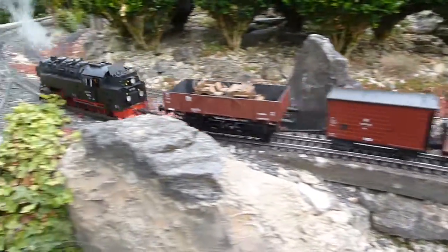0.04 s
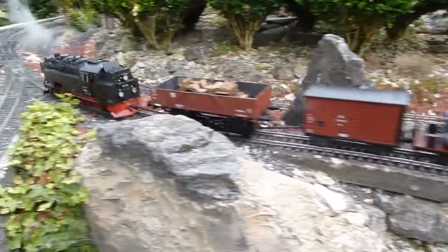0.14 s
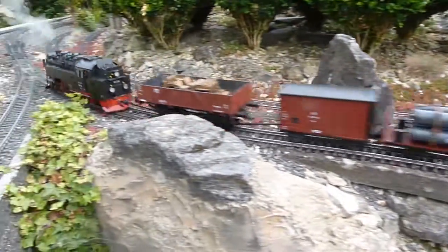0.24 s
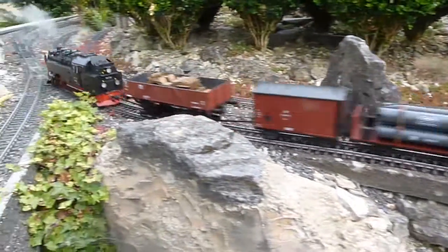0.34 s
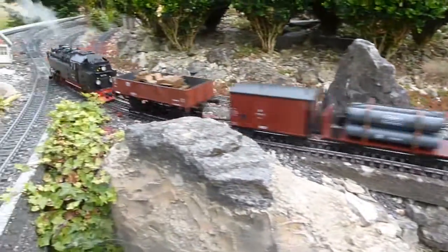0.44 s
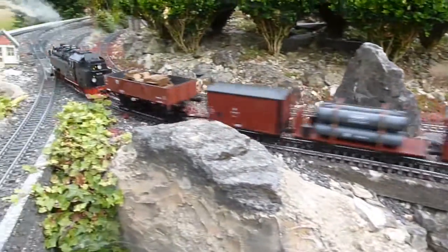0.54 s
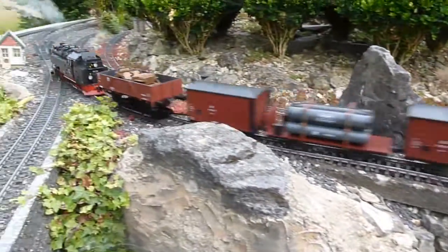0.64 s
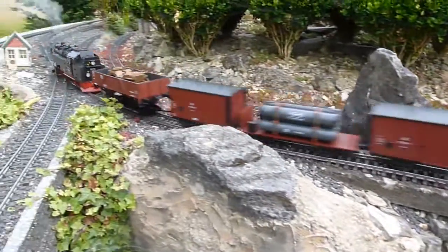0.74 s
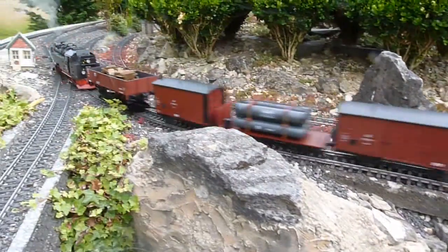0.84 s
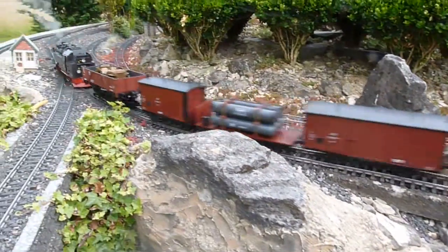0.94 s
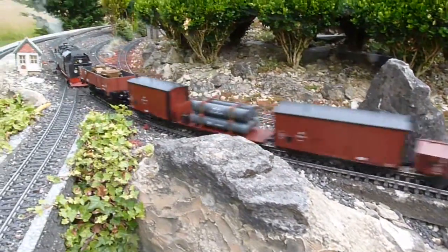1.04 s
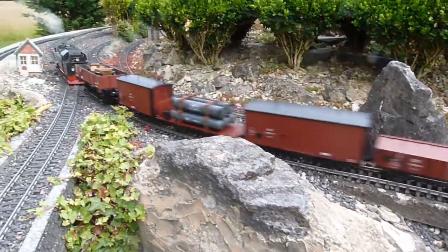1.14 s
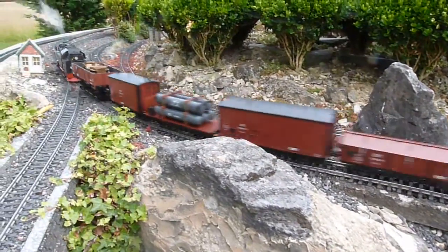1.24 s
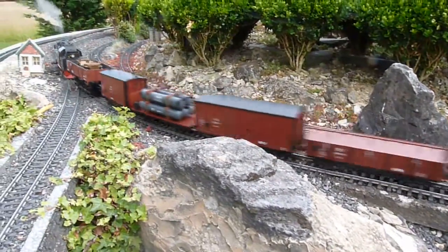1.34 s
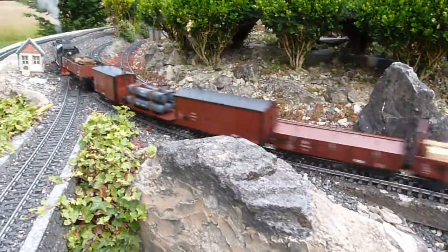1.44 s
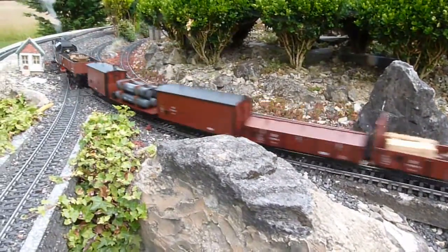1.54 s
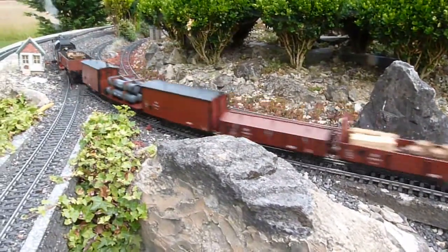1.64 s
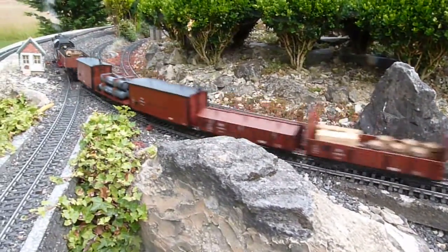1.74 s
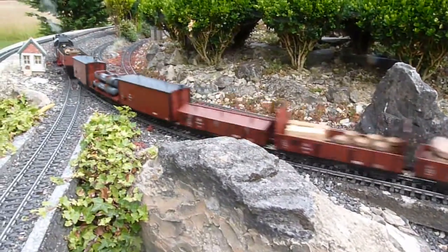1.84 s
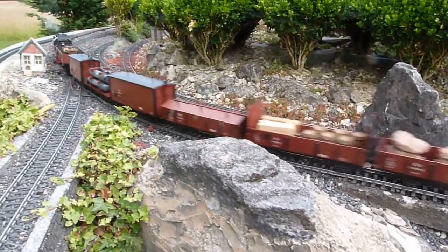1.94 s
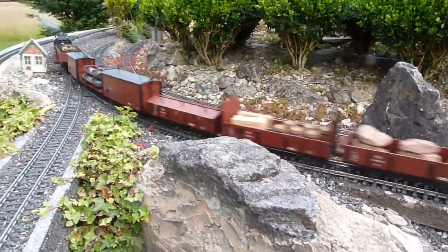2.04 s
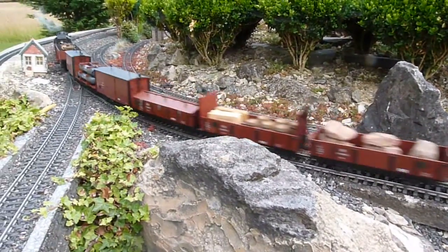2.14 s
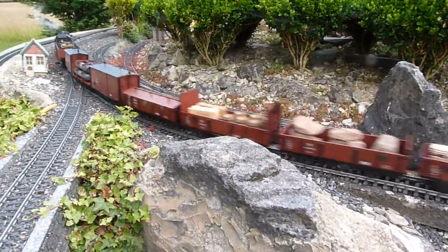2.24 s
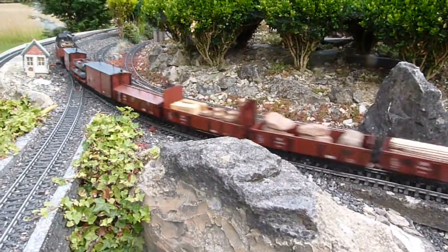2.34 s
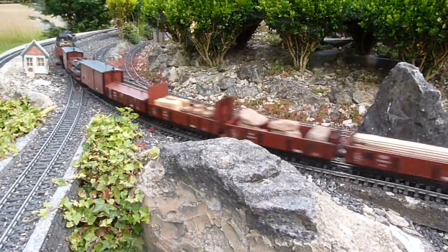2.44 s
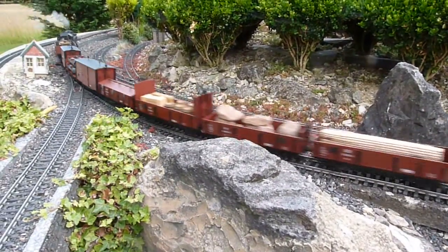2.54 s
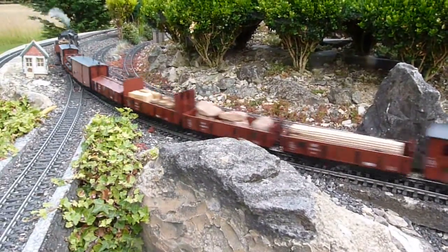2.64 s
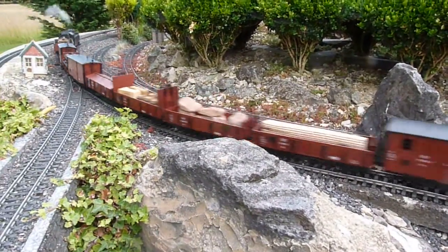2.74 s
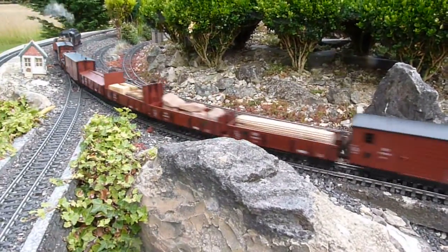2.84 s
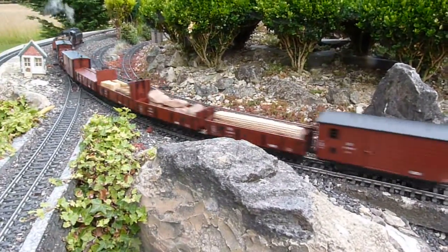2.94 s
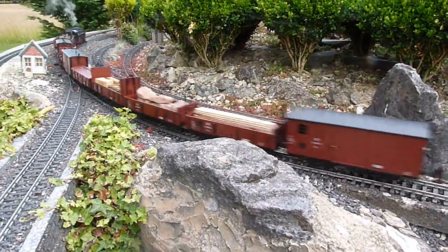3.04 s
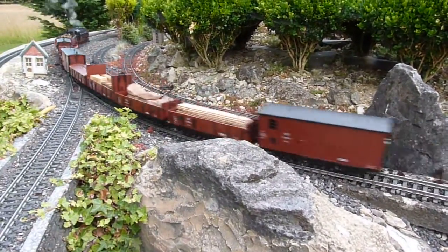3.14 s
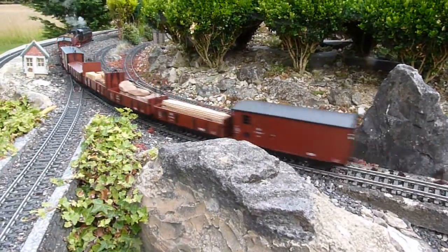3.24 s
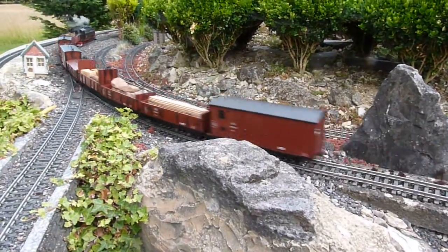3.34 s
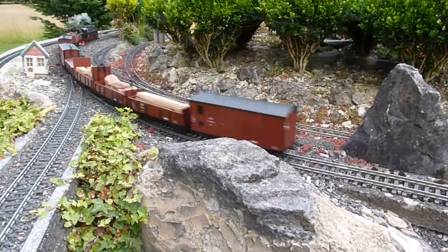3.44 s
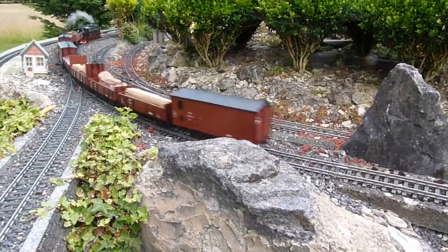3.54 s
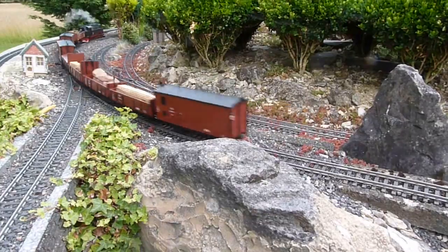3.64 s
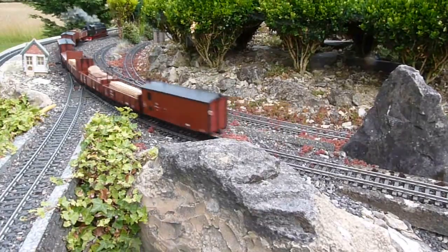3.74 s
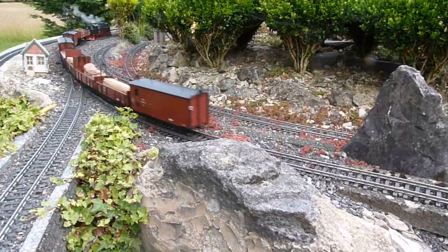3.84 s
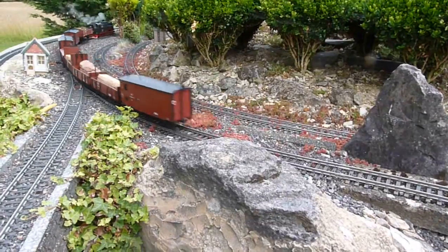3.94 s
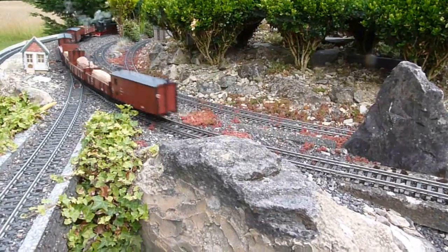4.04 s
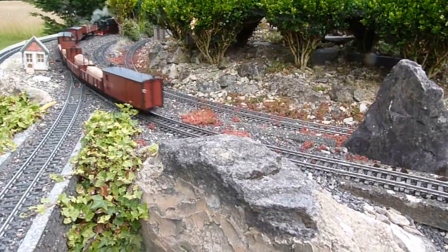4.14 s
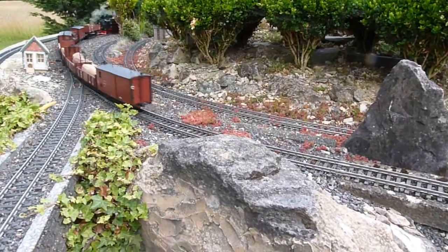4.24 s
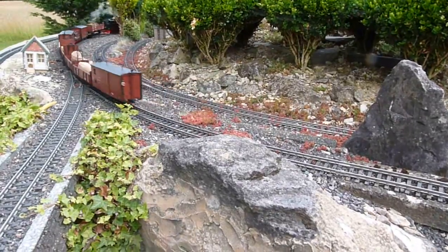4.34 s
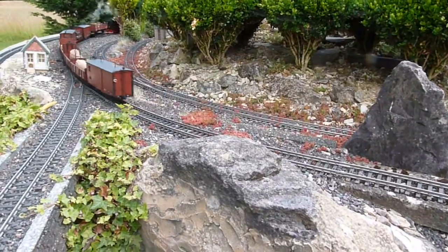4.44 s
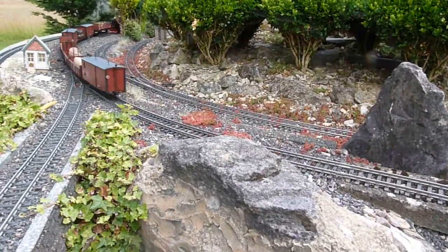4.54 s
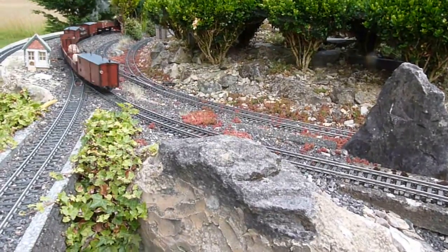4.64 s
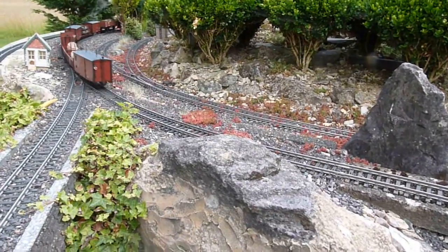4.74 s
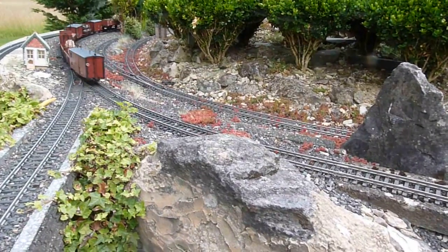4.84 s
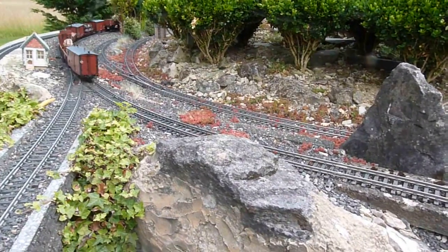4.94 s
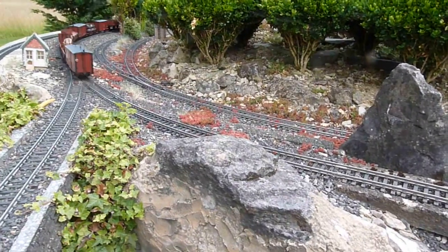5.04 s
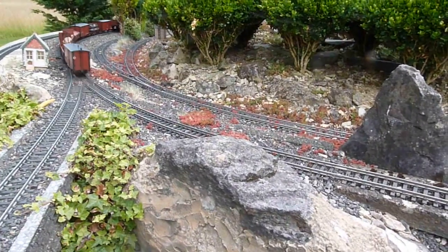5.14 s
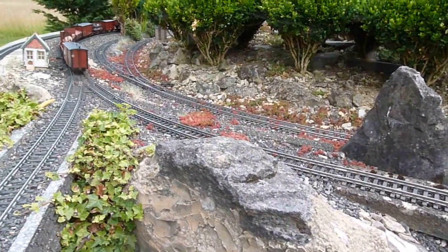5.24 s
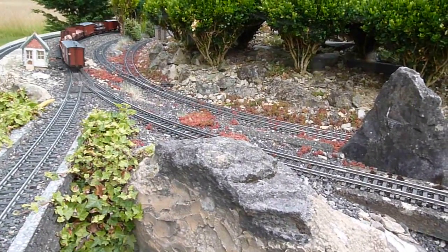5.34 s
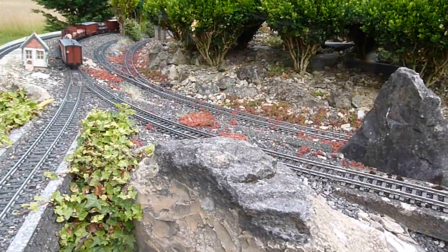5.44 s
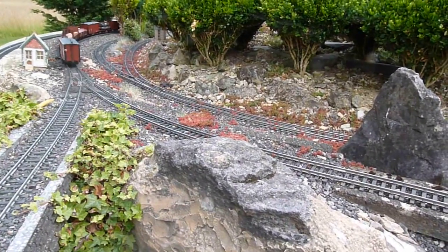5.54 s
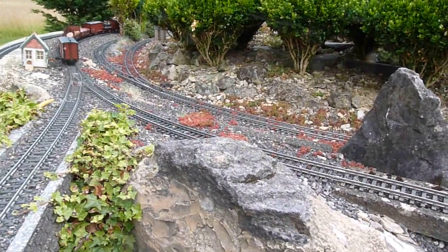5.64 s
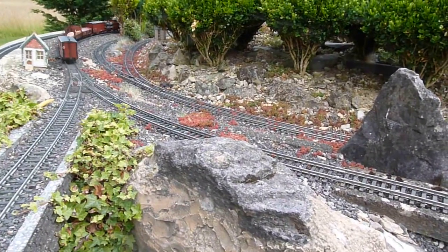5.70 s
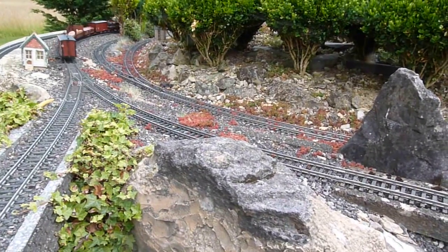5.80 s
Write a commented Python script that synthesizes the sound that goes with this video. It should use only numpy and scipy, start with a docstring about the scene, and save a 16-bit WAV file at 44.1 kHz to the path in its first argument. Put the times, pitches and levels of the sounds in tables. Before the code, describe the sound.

A model steam locomotive starts close with a bright, breathy hiss that steadily recedes. Its wagons follow with gritty rolling, irregular light clicks, hollow bumps and brief hoarse flange rubs, busiest in the first half. After the last van passes, the clatter weakens; a sharp coupling clank comes near the end. Outdoors among rocks and shrubs, short dull echo, small fixed microphone close to the track, softened top end.

```python
"""A close steam hiss opens the scene: a live-steam model locomotive draws wagons away round a garden curve.
The hiss is shaped noise that fades with distance; rolling and grit are tiny random contacts in resonances.
Wheels click over rail joints and bump the wagons: dying scatters of rebounds, with booms that fall in pitch.
Flanges rub as ringing noise, hard blows ring the wagon decks, and the closed van drums as it goes by.
Near the end a slack coupling clanks with a low bump; the quiet air of the garden lies under it all."""
import sys
import numpy as np
from scipy import signal
from scipy.fft import rfft, irfft, next_fast_len
from scipy.io import wavfile
from scipy.ndimage import uniform_filter1d

SR = 44100
rng = np.random.default_rng(int(sys.argv[2]) if len(sys.argv) > 2 else 0)


def materialize(psi):
    """Save the field psi as 16-bit PCM at rate SR to the path in sys.argv[1].

    A 1-D psi becomes a single channel; in a 2-D psi each row is a channel.
    """
    bounded = np.clip(np.atleast_2d(psi).T, -1, 1)
    quanta = np.round(bounded * 32767).astype(np.int16)
    wavfile.write(sys.argv[1], SR, quanta)


N = 258855  # samples, about 5.9 s


def from_db(db):
    """Decibels to gain."""
    return 10 ** (np.asarray(db) / 20)


def rms_one(x):
    """Scale to unit power."""
    return x / np.sqrt(np.mean(x ** 2) + 1e-20)


def drift(corner_hz):
    """Slow random wander of spread 1: noise through two equal low-pass poles, at a 40th of the sample rate."""
    step = 40
    r = np.exp(-2 * np.pi * corner_hz * step / SR)
    noise = rng.standard_normal(N // step + 2002)
    slow = signal.lfilter([1], [1, -2 * r, r * r], noise)[2000:]  # drop the filter's start-up
    return np.interp(np.arange(N) / step, np.arange(len(slow)), rms_one(slow))


def colour(x, spectrum):
    """Give a steady sound a spectrum, interpolated in dB over log frequency; rms 1."""
    hz, db = np.transpose(spectrum)
    size = next_fast_len(N)
    bins_hz = np.maximum(np.fft.rfftfreq(size, 1 / SR), 1)
    gain = from_db(np.interp(np.log(bins_hz), np.log(hz), db))
    return rms_one(irfft(rfft(x, size) * gain, size)[:N])


def band(x, low_hz, high_hz):
    """A gentle band-pass."""
    return signal.sosfilt(signal.butter(2, [low_hz, high_hz], "band", fs=SR, output="sos"), x)


def resonate(x, modes):
    """Parallel two-pole resonances of alternating sign."""
    out = 0
    for k, (hz, width_hz, db) in enumerate(modes):
        r = np.exp(-np.pi * width_hz / SR)
        poles = [1, -2 * r * np.cos(2 * np.pi * hz / SR), r * r]
        peak_gain = from_db(db) * (1 - r * r) / 2
        out = out + (-1) ** k * peak_gain * signal.lfilter([1, 0, -1], poles, x)
    return out


def evened(x, window_s):
    """Hold a sustained ring at a steady level; rms 1."""
    power = np.abs(uniform_filter1d(x ** 2, int(window_s * SR)))
    return rms_one(x / np.sqrt(power + 1e-20))


def grains(per_s, spread_db):
    """Tiny contacts at random moments, most weak and a few strong."""
    sizes = from_db(spread_db * np.minimum(rng.exponential(1, N), 3.5))
    signs = rng.choice([-1, 1], N)
    struck = rng.random(N) < per_s / SR
    return sizes * signs * struck + 1e-18


def chatter(t60, crack):
    """One blow: a first hard contact, then a dying scatter of small rebounds."""
    t = np.arange(SR // 4) / SR
    force = rng.standard_normal(len(t)) * from_db(-60 * t / t60)
    force[0] += crack
    return force


def add(out, s, sound, db, t60):
    """Mix in a blow with the energy of a sound that starts at db and dies by 60 dB in t60."""
    at = int(s * SR)
    energy = t60 * SR / np.log(1e6)
    sound = sound * from_db(db) * np.sqrt(energy / np.sum(sound ** 2))
    out[at:at + len(sound)] += sound[:N - at]


# steady speed and nearest distance; the locomotive is nearest first, the last wagon some seconds later
SPEED_M_PER_S, TRACK_M, LOCO_PASSES_S, TAIL_PASSES_S = 0.87, 1.56, 0.032, 3.55


def spreading_db(since_s):
    """Inverse-distance loss of a part of the train that went by since_s ago; none before it passes."""
    distance_m = np.hypot(TRACK_M, SPEED_M_PER_S * np.maximum(since_s, 0))
    return 20 * np.log10(TRACK_M / distance_m)


# Spectrum of the garden's air. Each row: frequency in Hz, relative density in dB per Hz.
GARDEN_SPECTRUM = [(25, -23), (50, -10), (66, -4), (78, -2), (95, -2), (130, 1), (250, 5), (500, -6.5),
                   (1500, -3), (4000, -11.5), (7500, -35)]


def garden_air(level_db=-47.5):
    """The quiet air of the garden: steady noise given a soft, mostly low spectrum."""
    return from_db(level_db) * colour(rng.standard_normal(N), GARDEN_SPECTRUM)


# Spectrum of the steam jet. Each row: frequency in Hz, relative density in dB per Hz.
STEAM_SPECTRUM = [(100, -37.5), (180, -8.5), (350, -22.5), (800, -3), (1200, -0.5), (1700, -1), (2300, 0.5),
                  (2900, 2.5), (3700, -1.5), (4400, -4.5), (5100, -12.5), (5900, -22.5), (6800, -22),
                  (7600, -38)]
STEAM_DB = -28.5  # at the nearest point
# the chimney turns away behind the wagons and is screened more and more
SCREENED_FROM_S, SCREEN_DB_PER_S = 2.27, 4.5


def steam(beat_hz=14.0, beat_db=0.5, flutter_db=1.0, waver_db=0.8):
    """The chimney's turbulent jet is noise; the quick exhaust beats almost merge into one hiss."""
    t = np.arange(N) / SR
    screening_db = SCREEN_DB_PER_S * np.maximum(t - SCREENED_FROM_S, 0)
    level_db = STEAM_DB + spreading_db(t - LOCO_PASSES_S) - screening_db
    beat_rate_hz = beat_hz * (1 + 0.029 * drift(1.23))
    beats = np.sin(2 * np.pi * np.cumsum(beat_rate_hz) / SR)
    level_db = level_db + beat_db * beats + flutter_db * drift(29) + waver_db * drift(2.7)
    return from_db(level_db) * colour(rng.standard_normal(N), STEAM_SPECTRUM)


# Brighter moments of the hiss. Each row: height in seconds, half length in seconds, level in dB,
# centre in Hz.
BRIGHT_SPURTS = [(.08, 0.12, -34.5, 3450), (1.842, .1, -43, 3500), (2.14, 0.11, -42, 3550),
                 (2.444, 0.068, -43, 4220), (2.682, 0.046, -39.5, 3660)]


def spurts(width_hz=800):
    """The hiss briefly turns brighter: swells of band-passed noise."""
    t = np.arange(N) / SR
    out = np.zeros(N)
    for s, half_s, db, hz in BRIGHT_SPURTS:
        hiss = rms_one(band(rng.standard_normal(N), hz - width_hz / 2, hz + width_hz / 2))
        out += from_db(db) * np.exp(-((t - s) / half_s) ** 2) * hiss
    return out


# Resonances of the hollow wagon bodies. Each row: frequency in Hz, width in Hz, strength in dB.
WAGON_MODES = [(212, 15, -21), (242, 48, -4), (457.7, 12, 3.5), (570, 110, -1), (662.5, 40, 3.5),
               (736, 129, 2), (877, 100, -1.5)]
# Resonances of the rails. Each row: frequency in Hz, width in Hz, strength in dB.
RAIL_MODES = [(1344, 130, -2.5), (1438, 62, 1), (1528, 19, -7), (1915, 230, -8.5), (2570, 150, -7.5),
              (3145, 110, -8.5), (3860, 300, -20), (5600, 240, -16)]
# Spectrum of the low rolling. Each row: frequency in Hz, relative density in dB per Hz.
RUMBLE_SPECTRUM = [(25, -33), (50, -17), (100, -21.5), (170, -5), (260, -3.5), (370, -4.5), (500, 2.5),
                   (1000, -3), (1500, 3), (1660, -4), (2000, -1), (4000, -5), (6200, -12.5), (7600, -40.5)]
# Rough wheels go by and the rolling swells. Each row: height in seconds, half length in seconds,
# change of the rails in dB, change of the wagon bodies in dB.
ROUGH_WHEELS = [(0.645, 0.054, 7.5, -1.5), (1.606, 0.1, 4.5, 3.5), (2.062, 0.21, 6, 2),
                (2.502, 0.073, 5, 2.5), (2.933, 0.16, 3.5, 3), (3.157, 0.088, 5, 1), (3.854, 0.066, 2, 3),
                (4.741, 0.057, 4, 5)]
RUMBLE_DB, BODY_DB, RAIL_DB = -32.5, -40, -39.5  # at the nearest point, before swells and jolts
RUMBLE_FALL, BODY_FALL, RAIL_FALL = 1.246, 0.96, 2.75  # fading with distance; 1 = inverse distance


def shaken(modes, own_db=1.5):
    """Rail roughness strikes each resonance with its own fluctuating stream of tiny contacts."""
    out = np.zeros(N)
    for mode in modes:
        contacts = grains(3000, 2.9) * from_db(own_db * np.tanh(drift(27)))
        out += resonate(contacts, [mode])
    return out


def rolling(jolt_db=1.0):
    """Roughness shakes track and wagons; rumble leaves with the locomotive, the rest with the last wagon."""
    t = np.arange(N) / SR
    loco_db, tail_db = spreading_db(t - LOCO_PASSES_S), spreading_db(t - TAIL_PASSES_S)
    body_db = BODY_DB + BODY_FALL * tail_db
    rail_db = RAIL_DB + RAIL_FALL * tail_db
    for s, half_s, rail_rise_db, body_rise_db in ROUGH_WHEELS:
        swell = np.exp(-((t - s) / half_s) ** 2)
        body_db = body_db + body_rise_db * swell
        rail_db = rail_db + rail_rise_db * swell
    bodies = from_db(body_db) * rms_one(band(shaken(WAGON_MODES), 180, 1100))
    rails = from_db(rail_db) * rms_one(band(shaken(RAIL_MODES), 1150, 5700))
    rumble = from_db(RUMBLE_DB + RUMBLE_FALL * loco_db) * colour(grains(4000, 3.1), RUMBLE_SPECTRUM)
    return from_db(jolt_db * drift(72)) * (bodies + rails + rumble)


# Resonances of the running gear. Each row: frequency in Hz, width in Hz, strength in dB.
RUNNING_GEAR_MODES = [(1150, 220, -2.5), (1870, 410, -1.5), (2420, 340, -5), (3280, 510, -1.5),
                      (3700, 390, 6.5), (4440, 400, -8)]
# contacts a second in each resonance, spread of their strengths, level at the nearest point
GRIT_PER_S, GRIT_SPREAD_DB, GRIT_DB = 260, 4, -37


def grit(clump_db=3.5, fall=2.3):
    """Contacts of the locomotive's rods and wheels ring in clumps of changing colour, soon lost with distance."""
    level_db = GRIT_DB + fall * spreading_db(np.arange(N) / SR - LOCO_PASSES_S)
    clatter = np.zeros(N)
    for mode in RUNNING_GEAR_MODES:
        clumps = from_db(clump_db * np.tanh(drift(24)))
        clatter += resonate(grains(GRIT_PER_S, GRIT_SPREAD_DB) * clumps, [mode])
    return from_db(level_db) * rms_one(band(clatter, 720, 4000))


LIGHT_TICKS_PER_S, LIGHT_TICK_DB, LIGHT_TICK_SPREAD_DB, TICK_T60_S = 17, -39.5, 2, 0.036


def light_ticks():
    """Wheels all along the train tick faintly at random moments and fade as it leaves."""
    out = np.zeros(N)
    for s in np.flatnonzero(rng.random(N) < LIGHT_TICKS_PER_S / SR) / SR:
        db = LIGHT_TICK_DB + spreading_db(s - TAIL_PASSES_S) + LIGHT_TICK_SPREAD_DB * rng.standard_normal()
        add(out, s, band(chatter(TICK_T60_S, crack=2.5), 2800, 5600), db, TICK_T60_S)
    return out


# Wheels clicking over rail joints. Each row: start in seconds, clack level in dB, bright tick level in dB,
# ring pitch in Hz, 60 dB decay of the clack in seconds.
JOINT_CLICKS = [(.016, -29, -28, 5200, .03), (.19, -18, -38, 3030, 0.033), (0.573, -18.5, -29, 2440, 0.029),
                (0.669, -26, -39, 1500, 0.034), (.696, -31, -30, 2700, .028),
                (0.754, -20.5, -34, 1340, .033), (1.0345, -26.5, -32, 2680, 0.056),
                (1.123, -23, -32, 2560, 0.03), (1.182, -32, -32, 2620, 0.03),
                (1.457, -30, -29.5, 2680, .033), (1.606, -29, -31, 2940, .033),
                (1.776, -26, -32, 4600, 0.031), (1.9607, -25, -30.5, 2550, 0.037),
                (2.144, -21, -49, 3050, 0.035), (2.374, -27.5, -33, 1360, 0.04),
                (2.527, -26, -52, 1400, 0.022), (2.571, -24, -34, 2610, 0.035),
                (2.776, -29.5, -52, 1470, 0.034), (2.822, -27, -34, 1410, 0.032),
                (2.98, -22, -40, 4430, 0.018), (3.177, -29, -43, 1400, 0.049),
                (3.2452, -29, -31, 2900, 0.026), (3.44, -23, -35, 2630, 0.042),
                (3.6416, -26, -35, 1530, 0.039), (3.84, -24.5, -35, 1450, 0.034),
                (3.847, -30, -38, 1470, 0.03), (3.898, -29, -39.5, 1460, .033),
                (4.0985, -27.5, -32, 1440, 0.031), (4.118, -32, -50, 1400, 0.028),
                (4.225, -25, -50, 1900, 0.021), (4.269, -30, -53, 1440, .025),
                (4.3017, -28.5, -36, 1400, 0.046), (4.326, -31, -46, 3120, 0.043),
                (4.336, -29.5, -43, 1450, 0.041), (4.504, -28.5, -32, 2500, 0.046),
                (4.6162, -29, -47, 2960, 0.016), (4.675, -33, -40, 1350, .033),
                (4.744, -29.5, -37, 1310, 0.037), (4.7685, -31.5, -51, 2800, 0.027),
                (4.7855, -34, -38, 1450, 0.03), (4.8677, -31.5, -43, 1390, 0.036),
                (4.982, -33, -38, 2140, 0.021), (5.417, -38.5, -62, 3020, 0.088),
                (5.6357, -32.5, -38.5, 1890, 0.045)]


def rail_joints(ring_width_hz=260, ring_share=0.37, tick_length=1.06):
    """A wheel drops into a gap: a clack of the bogie, ringing at its own pitch, and a bright metal tick."""
    out = np.zeros(N)
    for s, clack_db, tick_db, hz, t60 in JOINT_CLICKS:
        clack = rms_one(band(chatter(t60, crack=1.5), 1500, 3620))
        ring = resonate(chatter(t60, crack=1.3), [(hz, ring_width_hz, 0)])
        ring = rms_one(band(ring, 700, 8200))
        add(out, s, np.sqrt(1 - ring_share) * clack + np.sqrt(ring_share) * ring, clack_db, t60)
        tick_t60 = t60 * tick_length
        add(out, s, band(chatter(tick_t60, crack=0.94), 4300, 5840), tick_db, tick_t60)
    return out


# Bumps of the wagon bodies. Each row: start in seconds, boom level in dB, reference pitch in Hz (the boom
# glides from above it to 0.8 of it), low thud level in dB, 60 dB decay of the boom in seconds,
# share of clean boom against rattle from 0 to 1.
BODY_BUMPS = [(.026, -29, 732, -35, 0.16, 0.6), (.108, -26.5, 732, -38, 0.1, 0.56),
              (.572, -28, 886, -43, 0.096, 0.7), (.932, -29.5, 806, -42, 0.11, 0.4),
              (1.528, -32.5, 667, -51, .14, 0.4), (1.604, -32, 710, -33, 0.098, 0),
              (1.718, -31.5, 725, -54, 0.33, 0.05), (2.184, -42, 595, -30, 0.063, 0),
              (2.377, -28.5, 527, -38, 0.14, 0.37), (2.541, -27.5, 731, -52, 0.092, 0.6),
              (2.571, -21, 683, -32, 0.077, 0.8), (2.586, -26.5, 558, -43, 0.06, .8),
              (3.176, -30.5, 670, -48, 0.21, 0.83), (3.27, -24.5, 620, -50, 0.07, 0.75),
              (4.342, -34, 633, -35.5, 0.18, 0.05), (4.379, -37, 594, -45, 0.056, 0.4),
              (4.736, -32, 677, -39, 0.2, 0.6), (4.864, -32, 754, -48, 0.12, 0.7),
              (5.203, -30.5, 690, -49, 0.077, 0.03), (5.526, -35.5, 692, -49, 0.13, 0.4),
              (5.635, -41, 614, -41, 0.074, 0.3)]


def bumps(glide=0.474, glide_s=0.01293, rise_s=0.005, rough=0.13, thud_length=0.69):
    """A jolt sends a bending wave along the track; its highs arrive first, so the boom falls in pitch."""
    out = np.zeros(N)
    t = np.arange(SR // 4) / SR
    for s, boom_db, hz, thud_db, t60, clean in BODY_BUMPS:
        pitch_hz = hz * (.8 + glide * np.exp(-t / glide_s))
        swell = (1 - np.exp(-t / rise_s)) * from_db(-60 * t / t60)
        wobble = 1 + rough * rms_one(band(rng.standard_normal(len(t)), 40, 200))
        boom = rms_one(swell * wobble * np.sin(2 * np.pi * np.cumsum(pitch_hz) / SR))
        # the loose body rattles on its axles; its floor thuds and dies sooner
        rattle = rms_one(band(chatter(t60, crack=20.0), hz * 0.79, hz * 1.38))
        add(out, s, np.sqrt(clean) * boom + np.sqrt(1 - clean) * rattle, boom_db, t60)
        thud_t60 = t60 * thud_length
        add(out, s, band(chatter(thud_t60, crack=4.2), 160, 600), thud_db, thud_t60)
    return out


# Flanges biting on the outer rail. Each row: start in seconds, length before the release ends it in seconds,
# level in dB, pitch at the start in Hz, pitch at the end in Hz, width in Hz.
FLANGE_RUBS = [(0.296, 0.1, -36.5, 2300, 2454, 450), (.76, 0.089, -38, 2960, 2450, 500),
               (.975, 0.107, -32.5, 2674, 2636, 500), (1.123, 0.1, -35.5, 2626, 2600, 298),
               (1.336, 0.069, -31.5, 2500, 2580, 350), (1.372, 0.096, -35.5, 3240, 3670, 700),
               (1.432, 0.078, -29.5, 2480, 2810, 480), (1.549, .23, -34, 2500, 2587, 340),
               (1.785, 0.1, -31.5, 2550, 2430, 300), (1.931, 0.13, -33.5, 2480, 2516, 320),
               (2.123, 0.17, -39, 3070, 3080, 360), (2.131, 0.17, -40, 2346, 2495, 500),
               (2.521, 0.22, -36, 2550, 2536, 250), (2.889, 0.45, -46.5, 2600, 2700, 800)]
RUB_ATTACK_S, RUB_RELEASE_S = 0.024, .06


def flanges(waver=0.01, flutter_db=1.5, scrape=0.55):
    """Flange slips keep a wheel singing, hoarse but steady; its pitch slides as the contact point wanders."""
    out = np.zeros(N)
    t = np.arange(N) / SR
    slips = grains(7000, 1.9)
    wander, bite = 1 + waver * drift(14), from_db(flutter_db * drift(30))
    for s, length, db, start_hz, end_hz, width_hz in FLANGE_RUBS:
        attack = (t - s) / RUB_ATTACK_S
        release = 1 - (t - s - length) / RUB_RELEASE_S
        pressure = np.clip(np.minimum(attack, release), 0, 1)
        on = np.flatnonzero(pressure)
        rubbed = resonate(slips[on[0]:on[0] + SR], [(start_hz, width_hz, 0)])
        song = evened(band(rubbed, start_hz - width_hz / 2, start_hz + width_hz / 2), .006)
        hoarse = rms_one(band(slips[-SR:], start_hz - width_hz, start_hz + width_hz))
        song = rms_one(song + scrape * hoarse)
        # reading the song faster or slower slides its pitch
        speed = np.interp(t[on], [s, s + length], [1, end_hz / start_hz]) * wander[on]
        slid = np.interp(np.cumsum(speed), np.arange(len(song)), song)
        out[on] += from_db(db) * pressure[on] * bite[on] * slid
    return out


# Hard blows that ring the wagon decks; the one at 5.17 s is the low bump of the coupling.
# Each row: start in seconds, level in dB, pitch as a ratio to the deck's resonances.
HARD_BLOWS = [(.675, -28.5, 1.18), (1.607, -21.5, 1.08), (1.619, -30, 1.3), (2.38, -27, 0.95),
              (2.571, -25, 1.52), (2.8255, -21.5, 1.03), (2.8335, -27, 1.15), (2.889, -28, 0.96),
              (3.441, -27.5, 1.35), (4.226, -34, 1.1), (4.5038, -23.5, 0.984), (4.512, -23, 1.08),
              (4.526, -35.5, 0.87), (5.1725, -32.5, 1.13)]
# Resonances of the deck at ratio 1. Each row: frequency in Hz, width in Hz, strength in dB.
DECK_MODES = [(280, 70, -9), (535, 37, 5), (840, 100, -2), (1480, 110, -12)]
DECK_T60_S = 0.044  # sets the energy of a blow


def deck_blows():
    """One hard contact sets the deck ringing; each blow is tuned a little differently."""
    out = np.zeros(N)
    for s, db, pitch in HARD_BLOWS:
        tuned = [(hz * pitch, width_hz, mode_db) for hz, width_hz, mode_db in DECK_MODES]
        ring = resonate(chatter(0.02, crack=12.0), tuned)
        add(out, s, band(ring, 300, 1700), db, DECK_T60_S)
    return out


# The closed van at the tail drums as it goes by. The one row: height in seconds, half length in seconds,
# level in dB, pitch in Hz, width in Hz.
VAN_DRUMMING = (3, 0.13, -40, 636, 84.5)


def van():
    """The roof and walls of the closed van drum steadily while it is near: evened resonant noise."""
    s, half_s, db, hz, width_hz = VAN_DRUMMING
    drum = resonate(rng.standard_normal(N), [(hz, width_hz, 0)])
    drum = evened(band(drum, hz - width_hz, hz + width_hz), 0.038)
    nearness = np.exp(-((np.arange(N) / SR - s) / half_s) ** 2)
    return from_db(db) * nearness * drum


# A coupling snatches and rebounds. Each row: start in seconds, level in dB, 60 dB decay in seconds,
# strongest frequency in Hz.
COUPLING_CLANKS = [(5.172, -19.5, 0.011, 3600), (5.1775, -25.5, 0.025, 1500), (5.186, -37, 0.07, 2950),
                   (5.195, -33, .03, 2950), (5.201, -27.5, 0.024, 3900), (5.209, -34, 0.04, 2900),
                   (5.2248, -30, 0.019, 2850), (5.231, -34.5, 0.1, 1750), (5.2437, -42, .022, 5200)]
# Resonances of the coupling. Each row: frequency in Hz, width in Hz, strength in dB.
COUPLING_MODES = [(1440, 250, -0.5), (1770, 84, 4.5), (2850, 120, 7), (4050, 180, 7.5), (4500, 250, -2),
                  (5540, 400, 4)]


def coupling(crack_share=0.34, focus=1.23):
    """The metal hook is pulled tight with a sharp crack, then rattles; contacts favour different resonances."""
    out = np.zeros(N)
    for s, db, t60, hz in COUPLING_CLANKS:
        force = chatter(t60, crack=8.5)
        ring = band(resonate(force, COUPLING_MODES), hz / focus, hz * focus)
        add(out, s, ring + crack_share * band(force, 1200, 4100), db, t60)
    return out


def rockery(x, t60=0.18, echo_db=-13):
    """Rocks and shrubs scatter a short, dull echo: decaying band-passed noise convolved with the sound."""
    t = np.arange(SR // 3) / SR
    delayed = t > .006  # seconds before the first echo
    scatter = band(rng.standard_normal(len(t)), 200, 5000) * from_db(-60 * t / t60) * delayed
    echo = signal.fftconvolve(x, scatter / np.linalg.norm(scatter))[:N]
    return x + from_db(echo_db) * echo


# The narrow band weakened by the ground. The one row: frequency in Hz, width in Hz, share removed in dB.
GROUND_NOTCH = (1654, 100, -8)


def ground_reflection(x):
    """The ground's reflection partly cancels a narrow band."""
    return x - resonate(x, [GROUND_NOTCH])


def scene():
    """The train among the rocks, over the quiet air of the garden."""
    contacts = rockery(light_ticks() + rail_joints() + bumps() + deck_blows())
    train = steam() + spurts() + rolling() + grit() + contacts + flanges() + van()
    return (ground_reflection(train) + rockery(coupling()) + garden_air())[None]


def record(dry):
    """A small microphone: the top rolls off from 7150 Hz, then ends steeply at 7600 Hz."""
    soft = signal.sosfilt(signal.butter(16, 7150, fs=SR, output="sos"), dry)
    return signal.sosfilt(signal.ellip(12, .2, 90, 7600, fs=SR, output="sos"), soft)


dry = scene()
out = record(dry)
materialize(out)
```